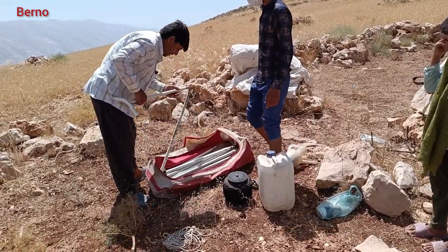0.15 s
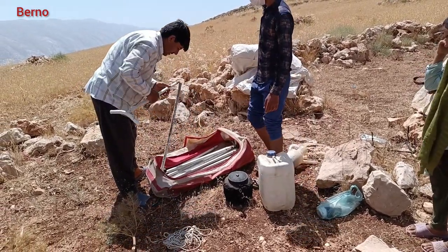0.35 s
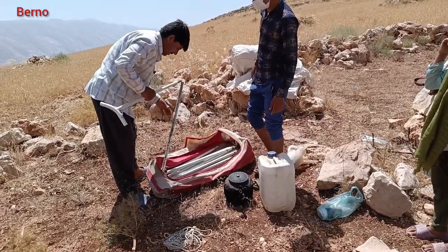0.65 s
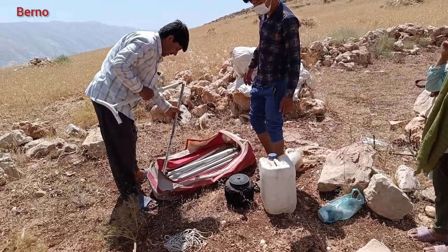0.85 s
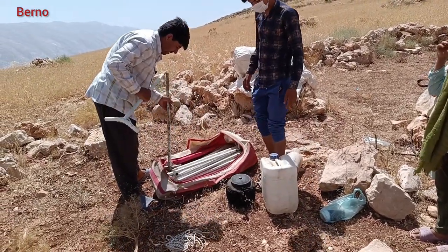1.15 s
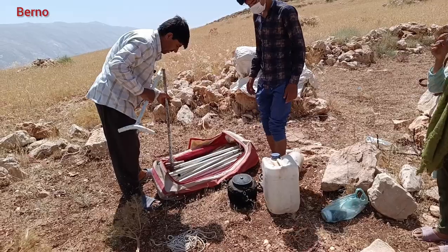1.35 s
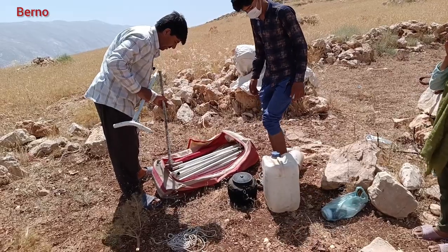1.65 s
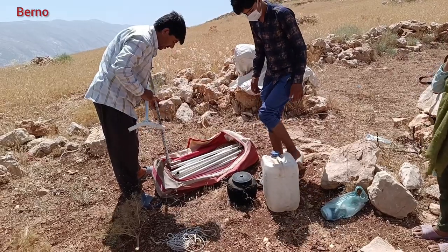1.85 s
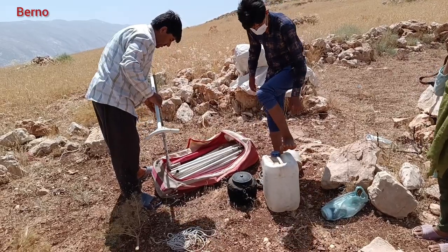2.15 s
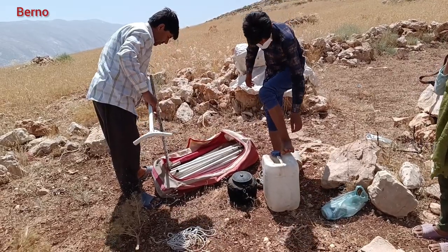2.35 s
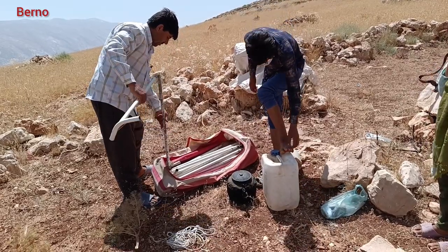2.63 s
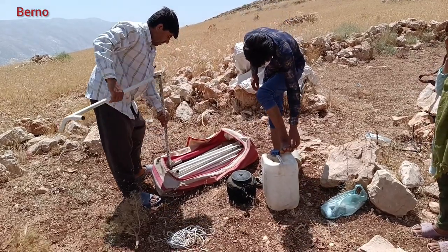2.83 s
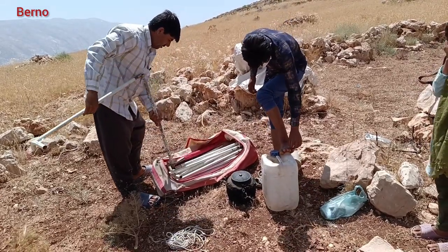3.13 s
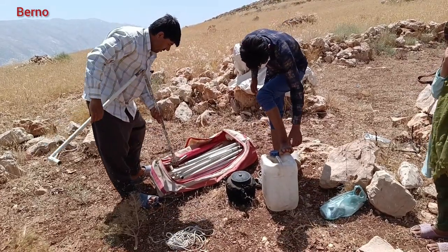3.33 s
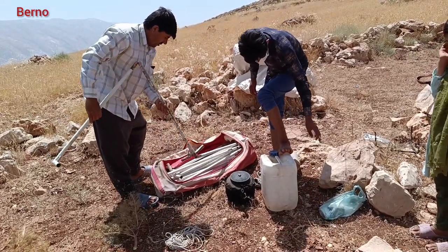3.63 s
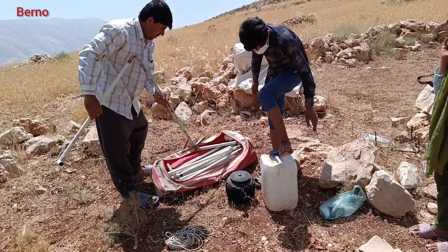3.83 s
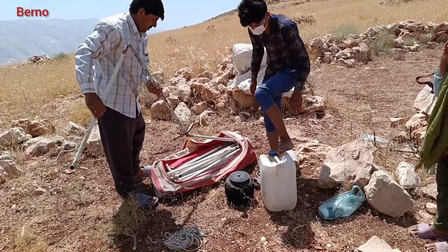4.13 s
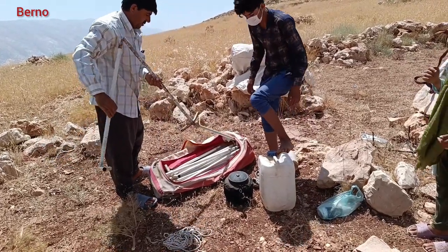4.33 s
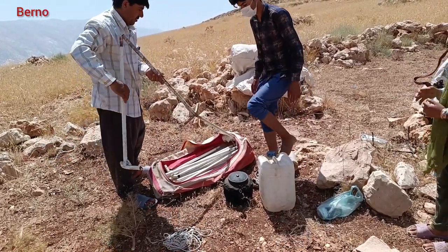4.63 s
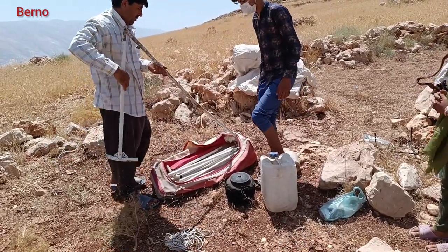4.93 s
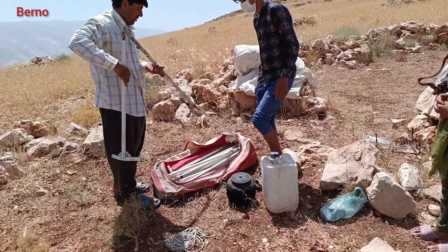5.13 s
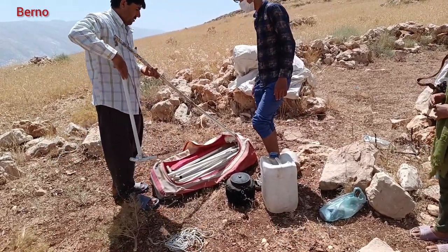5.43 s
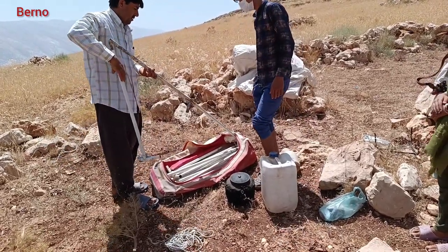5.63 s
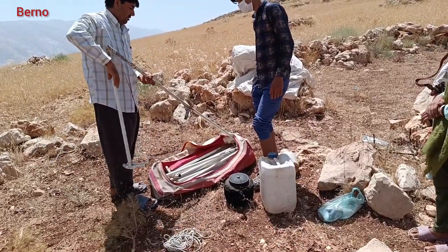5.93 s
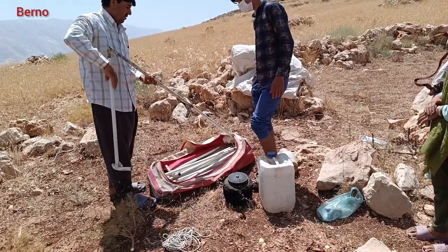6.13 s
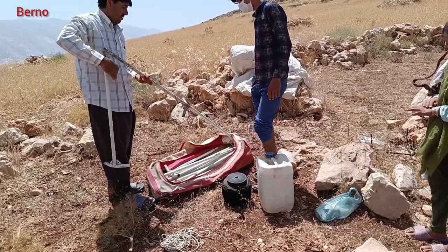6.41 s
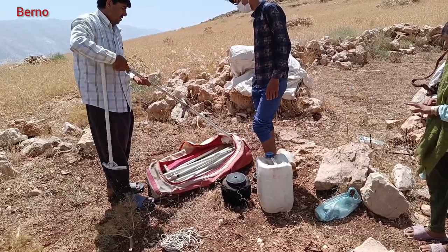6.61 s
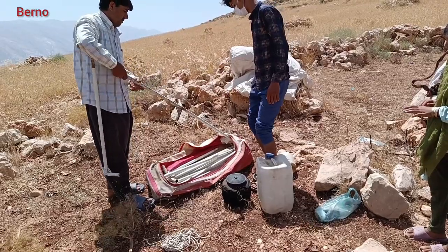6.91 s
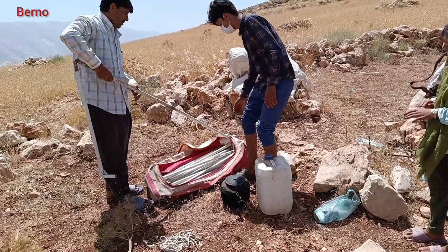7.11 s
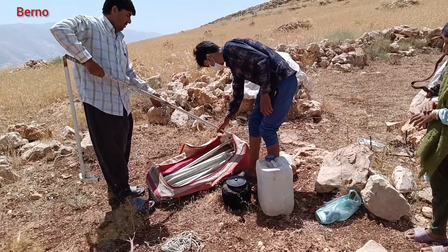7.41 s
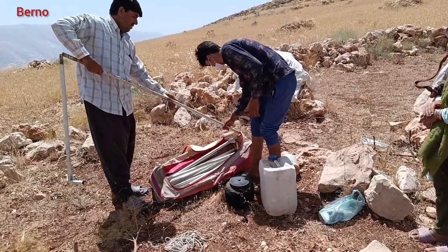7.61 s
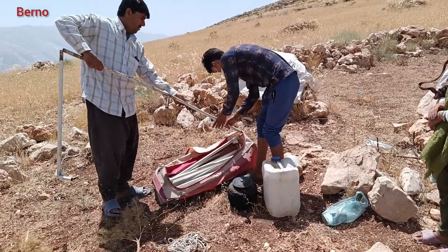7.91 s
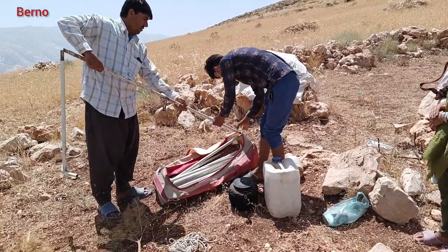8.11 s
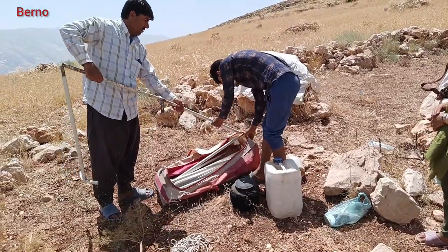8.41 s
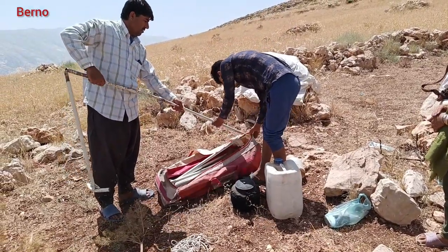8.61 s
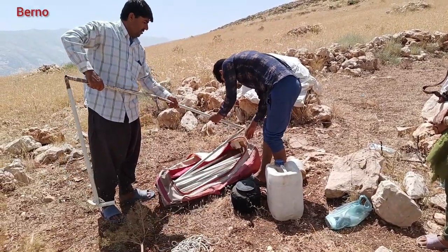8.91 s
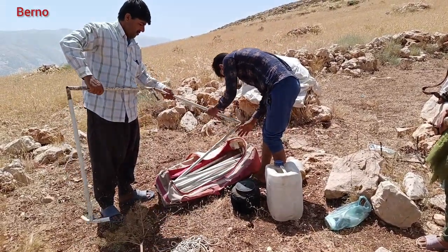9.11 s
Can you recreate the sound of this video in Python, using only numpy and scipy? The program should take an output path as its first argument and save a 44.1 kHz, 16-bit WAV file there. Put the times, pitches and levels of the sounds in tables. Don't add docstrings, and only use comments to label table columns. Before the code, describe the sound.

Close outdoor stereo sound of tent poles being pulled from a bag and joined. Tubes slide with a gritty metallic scrape, knock in short ringing rattles, then click and squeak as they fit together. The bag rustles softly. Gusts thump dully at the microphone, strongest early on, while dry grass hisses faintly throughout.

```python
import sys
import numpy as np
from scipy import signal
from scipy.fft import rfft, irfft, next_fast_len
from scipy.io import wavfile
from scipy.ndimage import uniform_filter1d, map_coordinates

SR = 44100
rng = np.random.default_rng(int(sys.argv[2]) if len(sys.argv) > 2 else 0)


def to_wav(sig):
    pcm = np.clip(np.atleast_2d(sig), -1, 1) * 32767
    pcm = np.round(pcm).astype(np.int16)
    wavfile.write(sys.argv[1], SR, pcm.T)


def makeup_ratio(level_db):
    decades = np.asarray(level_db, float) / 20
    return 10 ** decades


N = 408366

# pitch_hz, level_db, t60_s (time to fade by 60 dB)
TUBE_MODES = [(652, -8.5, 0.047), (1180, -29.5, 0.063), (1260, 5, 0.029), (1640, -37, 0.086),
              (1750, -5.5, 0.21), (1910, -3, 0.075), (2340, 0, 0.085), (2540, -10, 0.14), (2860, 0, 0.15),
              (2900, 5.5, 0.02), (3233, -4, 0.13), (3560, -0.5, 0.047)]
# pitch_hz, level_db, t60_s
WALL_MODES = [(4770, -12, 0.12), (5150, -3, 0.037), (5520, -23, 0.13), (5850, -7, 0.26), (6340, -4, 0.14),
              (6870, -6.5, 0.13), (6700, -3, 0.13), (6700, -13, 0.098), (7450, -5.5, 0.078),
              (8060, -55, 0.19), (8800, -29, 0.18), (8484, -3, 0.042), (9560, -17.5, 0.14)]
# pitch_hz, level_db (per Hz)
CRACK_COLOUR = [(290, -69), (500, -10), (787, -29), (952, -41), (1170, -14.5), (1410, -23.5), (1640, -20.5),
                (2220, -22), (2500, -19), (3400, -15), (3660, -11), (7270, 16), (9060, -5.5), (15300, 11),
                (16500, -52)]
# pitch_hz, level_db (per Hz)
FIZZ_COLOUR = [(8000, 6.5), (8800, 7.5), (11000, 12.5), (15000, 13), (16500, -34.5)]
# pitch_hz, level_db (per Hz)
GRASS_COLOUR = [(120, -25), (200, -2.5), (573, -7), (829, -12.5), (1240, 4), (1470, -12), (2800, -11.5),
                (3770, -12), (7320, -14.5), (8490, -28), (8970, -27.5), (15000, -25), (16500, -16.5)]


def in_time(rows):
    s, *columns = np.transpose(rows)
    return [np.interp(np.arange(N) / SR, s, column) for column in columns]


def rms_one(x):
    return x / np.sqrt(np.mean(x ** 2) + 1e-20)


def response(hz, points, low_hz, high_hz):
    hz = np.maximum(hz, 1)
    point_hz, point_db = np.array(points).T
    gain = makeup_ratio(np.interp(np.log(hz), np.log(point_hz), point_db))
    edges = (1 + (low_hz / hz) ** 8) * (1 + (hz / high_hz) ** 16)
    return rms_one(gain / np.sqrt(edges))


def coloured(x, points, low_hz=20, high_hz=20000):
    size = next_fast_len(x.shape[-1])
    gain = response(np.fft.rfftfreq(size, 1 / SR), points, low_hz, high_hz)
    return irfft(rfft(x, size) * gain, size)[..., :x.shape[-1]]


def drift(rate_hz, channels=1):
    r = np.exp(-2 * np.pi * rate_hz / SR)
    noise = rng.standard_normal((channels, N + SR))
    slow = signal.lfilter([1], [1, -2 * r, r * r], noise)[:, SR:]
    return rms_one(slow)


def panned(pan_db):
    return makeup_ratio(np.multiply.outer([.5, -.5], pan_db))


def stereo_noise(alike):
    mid, side = rng.standard_normal((2, N))
    alike = np.clip(alike, 0, 1)
    return np.sqrt((1 + alike) / 2) * mid + np.sqrt((1 - alike) / 2) * side * [[1], [-1]]


def centred(x, share):
    return x + np.clip(share, 0, 1) * (x.mean(axis=0) - x)


def swells(rows, rise_db_per_s, fall_db_per_s, rest_db):
    t = np.arange(0, N, 64)[:, None] / SR
    s, held, db = np.transpose(rows)
    loss = rise_db_per_s * np.maximum(s - t, 0) + fall_db_per_s * np.maximum(t - s - held, 0)
    level_db = np.maximum(np.max(db - loss, axis=1), rest_db)
    return np.interp(np.arange(N) / SR, t[:, 0], level_db)


def ringing(modes, chance, t, spread_db, side_db, detune):
    hz, db, t60 = np.transpose(modes)[:, :, None]
    chance = np.clip(chance[:len(modes)], -1.5, 1.5)
    pitch = hz * (1 + detune * chance[:, 2:])
    rings = np.sin(2 * np.pi * pitch * t) * makeup_ratio(-60 * t / t60)
    gains = makeup_ratio(db[:, 0] + spread_db * chance[:, 0]) * panned(side_db * chance[:, 1])
    return rms_one(gains) @ rings


def wind():
    # start_s, level_db, pan_db (left over right)
    gusts = [(0.0, -57, 16), (0.2, -55, 13), (0.7, -34.5, -8.5), (1.0, -46, -15), (1.9, -42, -5.5),
             (2.37, -45, -28.5), (2.91, -53, 1), (3.3, -42.5, -15.5), (3.85, -43, -14), (4.05, -49, -7),
             (4.88, -61.5, -14.5), (5.04, -43, -8), (5.75, -68.5, 3), (6.42, -54.5, -5), (6.75, -65, 2),
             (7.43, -48, -22.5), (7.68, -57.5, -5.5), (9.26, -56.5, -7.5)]
    # start_s, peak_db, pitch_hz, pan_db
    eddies = [(0.038, -28.5, 136, 34.5), (0.167, -24, 176, -1), (0.657, -24, 148, -17),
              (0.815, -27.5, 278, -25), (1.168, -25, 214, -24.5), (1.409, -31, 124, -27),
              (1.847, -32, 242, -35.5), (1.997, -21.5, 136, -16), (2.2907, -20, 197, -33),
              (2.376, -26.5, 200, -38), (2.447, -27.5, 199, -31), (2.387, -21, 206, -37),
              (2.66, -35, 192, -24), (3.283, -25.5, 207, -23), (3.718, -38, 106, -9),
              (3.991, -31, 173, -26), (5.015, -24, 146, 22), (6.199, -32.5, 240, 1), (7.411, -30, 138, -27),
              (8.058, -24, 400, 3), (8.212, -29, 380, 4), (8.545, -31.5, 140, -16),
              (8.947, -32.5, 158, -24)]
    # pitch_hz, level_db (per Hz)
    wind_colour = [(18, -48), (30, -18), (57, -0.5), (80, 4.5), (178, -1), (220, -5.5), (448, -19.5),
                   (631, -9), (900, -50), (1170, -66), (1980, -120)]
    db, pan_db = in_time(gusts)
    lumps = rms_one(makeup_ratio(5.3 * drift(33, channels=2)) * rng.standard_normal((2, N)))
    buffet = coloured(lumps, wind_colour, 81, 391)
    buffet /= np.sqrt(uniform_filter1d(buffet ** 2, size=SR // 5) + 1e-3)
    out = makeup_ratio(db - 2.0) * panned(pan_db) * buffet
    t = np.arange(SR // 20) / SR
    for s, peak_db, hz, side_db in eddies:
        i = round(s * SR)
        puff = np.sin(2 * np.pi * hz * t) * np.exp(-((t * hz - 1.1) / 0.64) ** 2)
        sides = makeup_ratio(peak_db - 10.0) * panned(side_db)[:, None] * puff
        out[:, i:i + len(t)] += sides[:, :N - i]
    return out


def grass():
    waver = makeup_ratio(2.5 * drift(5, channels=2))
    low = makeup_ratio(-7.5) * coloured(stereo_noise(0.49), GRASS_COLOUR, 177, 880) * waver[0]
    high = makeup_ratio(-6.5) * coloured(stereo_noise(0.064), GRASS_COLOUR, 1640, 9300) * waver[1]
    hiss = makeup_ratio(-4.5) * coloured(stereo_noise(0.07), GRASS_COLOUR, 6700)
    return makeup_ratio(-61) * (low + high + hiss)


def scrape(contacts):
    # start_s (of full pressure), held_s, level_db, low_db (tube modes, relative)
    strokes = [(0.0, 0.36, -52, -10), (1.17, 0.11, -45, -6), (1.96, 0.18, -71.5, 5.5),
               (2.991, 0.087, -51.5, -1), (3.461, 0.11, -46.5, -1.5), (4.26, 0.1, -56.5, -4),
               (5.1, 0.4, -59, -6.5), (6.0, 0.096, -46.5, -8), (6.3, 0.066, -50.5, -27),
               (6.55, 0.052, -59, -10), (7.0, 0.32, -58.5, -1), (7.45, 0.17, -51.5, -14),
               (7.951, 0.22, -54.5, -3.5), (8.35, 0.27, -63, -11.5), (8.85, 0.18, -58.5, -6.5)]
    # start_s, held_s, level_db
    stirs = [(0.18, 0.04, -47.5), (0.95, 0.31, -54.5), (1.63, 0.019, -55.5), (1.95, 0.067, -57),
             (2.98, 0.016, -60), (3.19, 0.022, -60), (3.46, 0.05, -49.5), (5.15, 0.34, -61),
             (5.97, 0.082, -66), (6.35, 0.068, -57.5), (7.15, 0.041, -53.5), (7.7, 0.21, -56.5),
             (8.0, 0.12, -55), (8.93, 0.19, -57.5)]
    press_db_per_s, ease_db_per_s, rest_db = 109, 76.5, -72
    scrape_db = swells([row[:3] for row in strokes], press_db_per_s, ease_db_per_s, rest_db)
    low_strokes = [(s, held, db + rel) for s, held, db, rel in strokes]
    low_db = swells(low_strokes, press_db_per_s, ease_db_per_s, rest_db - 6.5)
    rustle_db = swells(stirs, rise_db_per_s=142, fall_db_per_s=110, rest_db=-75)
    out = makeup_ratio(scrape_db - 7.0) * coloured(contacts, FIZZ_COLOUR, 3800)
    out += makeup_ratio(rustle_db) * coloured(centred(contacts, 1.0), GRASS_COLOUR, 307, 730)
    t = np.arange(2048) / SR
    even = np.zeros((len(WALL_MODES), 3))
    for db, modes, force, edges in ((scrape_db, WALL_MODES, contacts, (3600, 8700)),
                                    (low_db, TUBE_MODES, centred(contacts, 0.067), (700, 3600))):
        ring = ringing(modes, even, t, 0, 0, 0) * makeup_ratio(-600 * t)
        rung = rms_one(signal.oaconvolve(force, ring, axes=1)[:, :N])
        raw = coloured(force, CRACK_COLOUR, *edges)
        out += makeup_ratio(db + 1.5) * (makeup_ratio(-3.5) * rung + makeup_ratio(-1.0) * raw)
    return out


def shifting(x, depth_db):
    _, _, frames = signal.stft(x, SR, nperseg=512)
    field = rng.standard_normal(frames.shape[1:])
    field = uniform_filter1d(field, size=3, axis=0)
    field = uniform_filter1d(field, size=9, axis=1)
    patches = rms_one(makeup_ratio(depth_db * rms_one(field)))
    return signal.istft(frames * patches, SR)[1][:, :N]


def afterrings():
    # start_s, pitch_hz, level_db, t60_s
    long_modes = [(0.00098, 2820, -60.5, 0.94), (.185, 4140, -52.5, 1.4), (.185, 2836, -59, 1),
                  (2.495, 1150, -61.5, 0.28), (1.163, 1250, -37, 0.091), (2.998, 1644, -22, 0.043),
                  (2.997, 4180, -44.5, 1.26), (2.996, 2460, -39, 0.26), (3.186, 2330, -35.5, 0.16),
                  (3.547, 4085, -51, 0.95), (4.956, 7500, -19.5, 0.089)]
    out, t = np.zeros(N + SR), np.arange(SR) / SR
    splits = rng.uniform(.001, .005, len(long_modes))
    for (s, hz, db, t60), split in zip(long_modes, splits):
        i = round(s * SR)
        pair = np.sin(2 * np.pi * hz * t) + 1.5 * np.sin(2 * np.pi * hz * (1 + split) * t)
        out[i:i + SR] += makeup_ratio(db - 60 * t / t60) * (1 - np.exp(-t / .003)) * pair
    return out[:N] * makeup_ratio(1.64 * drift(47))


def rattle(contacts):
    # start_s, peak_db, low_db (tube modes, relative), t60_s (of the rattle)
    ticks = [(0.184, -21.5, -30, 0.24), (0.568, -51.5, -5, 0.1), (1.8523, -40.5, -45, 0.12),
             (4.69, -40, -40, 0.34), (2.107, -39, -22, 0.092), (2.49, -36, -27, 0.42),
             (3.922, -29.5, -26, 0.11), (4.0542, -40, -19, 0.41), (4.7772, -33, -20.5, 0.11),
             (4.9552, -16.5, -34.5, 0.18), (5.553, -37, -46, 0.21), (5.58, -31.5, -49, 0.1),
             (5.622, -38.5, -21, 0.22), (5.8425, -20.5, -33, 0.33), (5.933, -48, -3, 0.24),
             (6.0751, -32, -19, 0.12), (7.45, -29, -22, 0.2), (7.548, -35, -28, 0.074),
             (7.761, -35.5, -15, 0.2), (7.8185, -45.5, -15, 0.11)]
    # start_s, peak_db, low_db, pitch_hz (strongest tube mode)
    clinks = [(0.118, -38, -6.5, 2460), (1.445, -45, -10, 1260), (3.1542, -46, 4, 1220),
              (3.3534, -38, -7, 1220), (3.412, -27.5, -8, 1710), (3.4522, -19.5, -12.5, 1750),
              (3.998, -45, -6.5, 2820), (4.8895, -36.5, -7.5, 2900), (5.2843, -53.5, 7.5, 2870),
              (7.039, -46, -6.5, 2690), (7.116, -38, -20, 3490), (7.2213, -19.5, -16, 1140),
              (8.1185, -32, -14.5, 3520), (8.538, -66.5, 11.5, 1295)]
    # start_s, peak_db, low_db, pitch_hz (strongest tube mode), t60_s
    clangs = [(0.9874, -32, -16.5, 2500, 0.15), (1.076, -17, -26.5, 2750, 0.19),
              (1.162, -18.5, -14, 2910, 0.15), (1.5412, -37.5, -0.5, 2380, 0.11),
              (1.5897, -45, 2.5, 1880, 0.15), (1.6212, -25.5, -9.5, 2370, 0.12),
              (1.669, -39, -3, 1180, 0.12), (2.0058, -36, -3, 1290, 0.086),
              (2.1868, -47, -1.5, 2330, 0.085), (2.957, -41.5, 1.5, 1210, 0.082),
              (2.995, -8.5, -18.5, 1630, 0.11), (3.1802, -26, -5, 1224, 0.13),
              (3.2957, -22.5, -13, 1640, 0.1), (3.495, -27.5, -22, 1060, 0.092),
              (3.5437, -17, -6, 2810, 0.11), (3.631, -25, -16.5, 1200, 0.12), (3.901, -47, -4, 2340, 0.06),
              (4.3076, -27.5, -19.5, 1296, 0.077), (4.336, -31, -8, 1274, 0.09),
              (8.8162, -29.5, -8, 1677, 0.09), (8.9608, -56, -1, 1140, 0.067)]
    # start_s, peak_db, low_db, t60_s
    rubs = [(5.474, -38, -56, 0.13), (3.511, -29.5, -9, 0.14), (5.9678, -25, -23, 0.11),
            (6.1044, -25.5, -25, 0.043), (6.385, -30.5, -51, 0.14), (7.9334, -45, -19, 0.3),
            (7.9588, -43, -23, 0.11), (7.9934, -33, -42, 0.16)]
    # start_s, peak_db, low_db, fizz_db (relative)
    snaps = [(6.234, -33, -40, -17), (6.2678, -24.5, -35, -17), (6.324, -33, -33, 3.5),
             (6.6433, -36, -28, -18), (6.682, -45, -25, -16), (7.6319, -21, -21, -20),
             (7.668, -32, -46, -13), (7.7288, -22.5, -31, -13), (7.853, -20.5, -22, -24),
             (8.0573, -19.5, -15.5, -19), (8.094, -21, -29, -26), (8.2126, -19.5, -24, -4.5),
             (8.2853, -34, -33, -18)]
    knocks = [(s, db, low_db, -24.5 + 0.35 * (db + 13.0), [(hz, 11, .09)], t60, 1.22)
              for s, db, low_db, hz, t60 in clangs + [(*clink, 0.045) for clink in clinks]]
    # start_s, peak_db, low_db, fizz_db, no leading mode, t60_s, rise_ms
    knocks += [(s, db, low_db, -20, [], t60, 1.25) for s, db, low_db, t60 in ticks]
    knocks += [(*snap, [], 0.0076, .4) for snap in snaps]
    knocks += [(s, db, low_db, -18, [], t60, 25) for s, db, low_db, t60 in rubs]

    chance = rng.standard_normal((len(knocks), 2, len(TUBE_MODES) + 2, 3))
    chance[:, 1, len(TUBE_MODES):] = 0
    out, t = np.zeros((2, N + SR)), np.arange(6144) / SR
    size = 2 * len(t)
    hz = np.fft.rfftfreq(size, 1 / SR)
    wall_crack = makeup_ratio(-9.5) * response(hz, CRACK_COLOUR, 1900, 8800)
    tube_crack = response(hz, CRACK_COLOUR, 860, 3140)
    fizz = makeup_ratio(-0.5) * response(hz, FIZZ_COLOUR, 7300, 20000)
    lead = 64
    late = np.exp(-2j * np.pi * hz * lead / SR)
    for (s, db, low_db, fizz_db, free, t60, rise_ms), (wall, tube) in zip(knocks, chance):
        i = round(s * SR)
        rise = 1 - np.exp(-1000 * t / np.clip(rise_ms, .2, 40))
        shape = makeup_ratio(-60 * t / np.clip(t60, .005, .3)) * rise
        shape *= 1 + 0.88 * np.exp(-t / 0.0025)
        force = rfft(makeup_ratio(db) * shape / shape.max() * contacts[:, i:i + len(t)], size)
        wall_ring = ringing(WALL_MODES, wall, t, spread_db=4, side_db=9, detune=.008)
        tube_ring = ringing(TUBE_MODES + free, tube, t, spread_db=6.5, side_db=4.5, detune=0.015)
        bright = wall_crack + makeup_ratio(-48.5) * rfft(wall_ring, size)
        low = tube_crack + makeup_ratio(-33) * rfft(tube_ring, size)
        sound = force * (bright + makeup_ratio(fizz_db) * fizz) + centred(force, 0.63) * makeup_ratio(low_db) * low
        out[:, i - lead:i - lead + size] += irfft(sound * late, size)
    return out[:, :N]


def poles():
    # start_s, left_lag_samples
    left_lag = [(0, -4), (6.3, -4), (6.6, 13), (9.3, 13)]
    grain = makeup_ratio(1.25 * drift(310) + 2.67 * drift(13.4))
    contacts = rms_one(grain * stereo_noise(0.076))
    knocks = rattle(np.pad(contacts, ((0, 0), (0, SR))))
    left, right = knocks + shifting(scrape(contacts), depth_db=5.0) + afterrings()
    heard_at = np.arange(N) - in_time(left_lag)[0]
    return np.array([map_coordinates(left, [heard_at], order=1), right])


def squeaks():
    # start_s, pitch_hz, level_db
    glides = [
        [(6.33, 3000, -64), (6.42, 3060, -51), (6.5, 3150, -64)],
        [(6.88, 2770, -67.5), (7.08, 2690, -53), (7.2, 2740, -69)],
    ]
    out = np.zeros(N)
    narrow = signal.butter(2, 80, fs=SR, output="sos")
    for rows in glides:
        a, b = round(rows[0][0] * SR), round(rows[-1][0] * SR)
        hz, db = in_time(rows)
        sides = signal.sosfilt(narrow, rng.standard_normal((2, b - a)))
        slip = sides[0] + 1j * sides[1]
        turn = np.exp(2j * np.pi * np.cumsum(hz[a:b]) / SR)
        octave = makeup_ratio(-23) * slip[::-1] * turn ** 2
        tone = rms_one(np.real(slip * turn + octave))
        out[a:b] += makeup_ratio(db[a:b] - 1.5) * tone * signal.windows.tukey(b - a, .1)
    return out


def scene():
    return wind() + grass() + poles() + squeaks()


def roll_off(x):
    return signal.sosfilt(signal.butter(12, 16990, fs=SR, output="sos"), x)


def record(dry):
    # pitch_hz, lost_share
    dropouts = [(2000, 0), (3000, .012), (8300, .006), (8700, .25), (10500, .14), (15500, .06)]
    dry = signal.sosfilt(signal.butter(3, 50, "high", fs=SR, output="sos"), dry)
    hz, s, frames = signal.stft(dry, SR, nperseg=1024)
    band = (hz / 345).astype(int)
    block = np.arange(len(s)) // 4
    share = np.interp(hz, *np.transpose(dropouts))[:, None]
    lost = rng.random((band[-1] + 1, block[-1] + 1))[band][:, block] < share
    treble = np.sum(np.abs(frames[:, hz > 12000]) ** 2, axis=(0, 1))
    attack = treble > makeup_ratio(16) * np.roll(treble, 2)
    edge_hz = np.where(attack, 16700, 15850)
    top_db = -np.clip((hz[:, None] - edge_hz) / 8, 0, 30)
    kept = frames * np.where(lost, makeup_ratio(-30), 1) * makeup_ratio(top_db)
    mix = signal.istft(kept, SR)[1][:, :N]
    return roll_off(mix)


dry = scene()
out = record(dry)
to_wav(out)
```